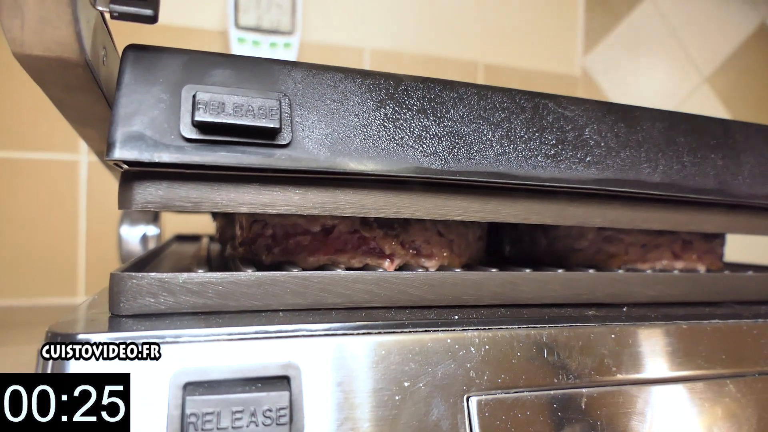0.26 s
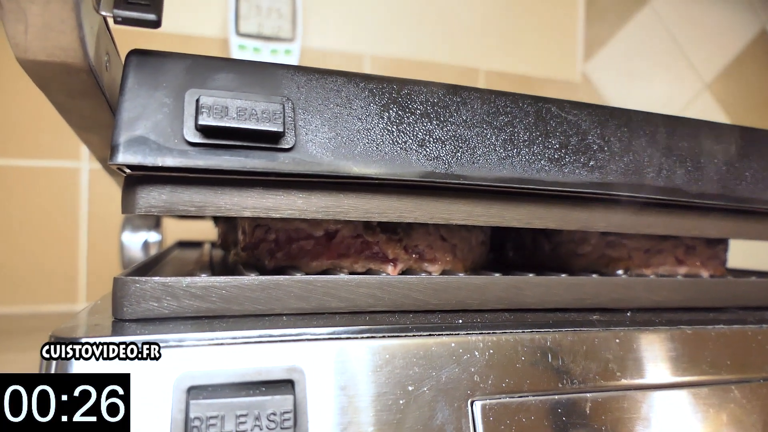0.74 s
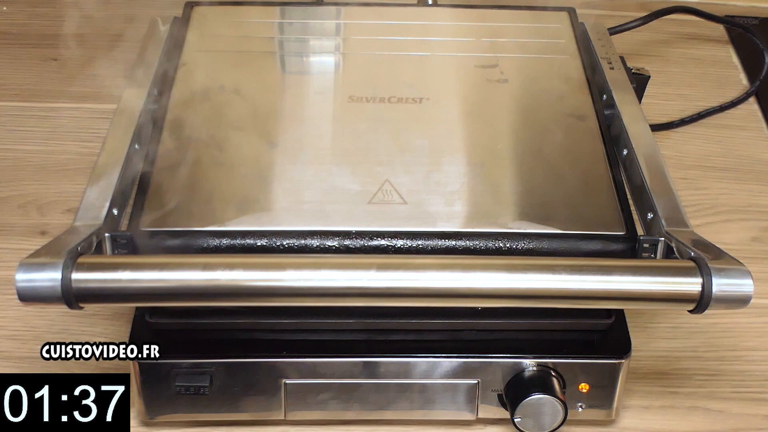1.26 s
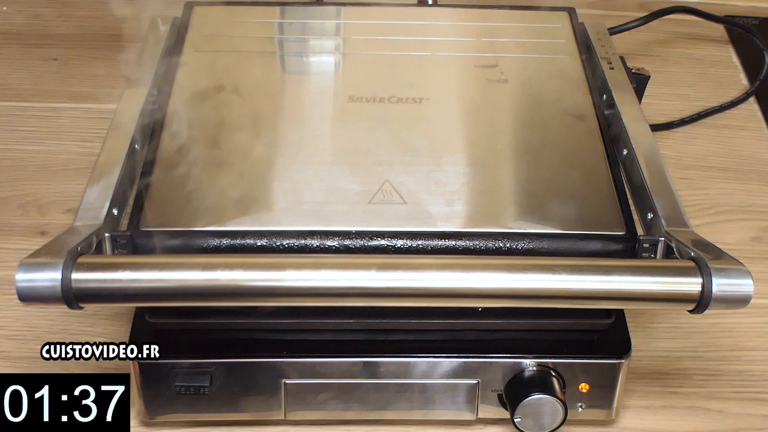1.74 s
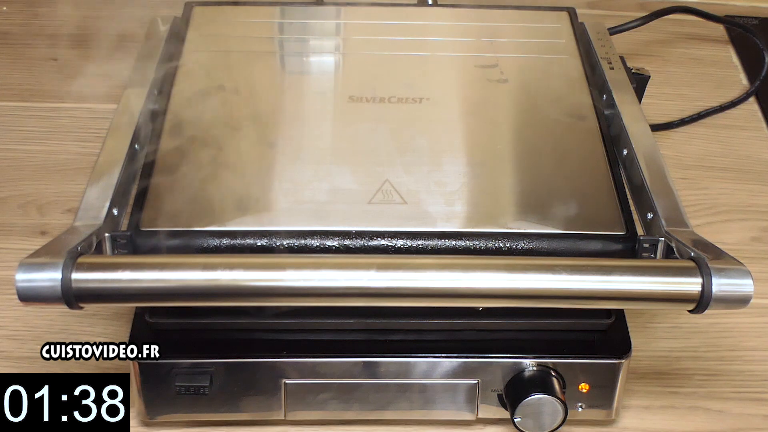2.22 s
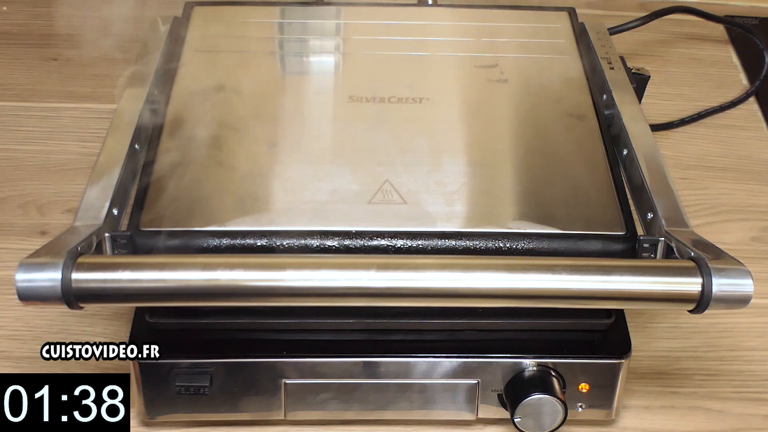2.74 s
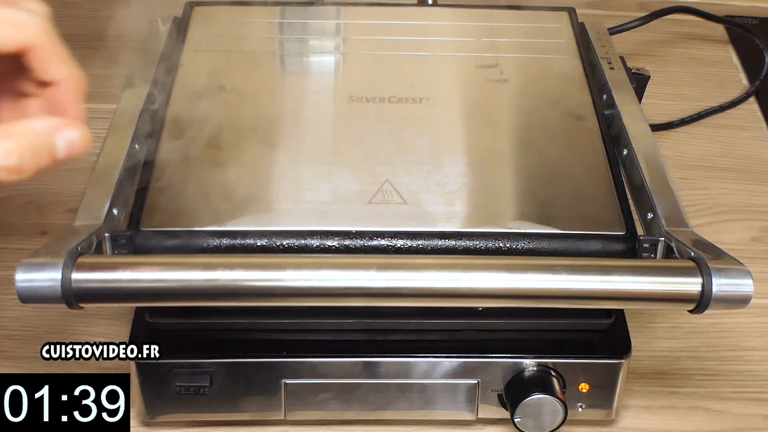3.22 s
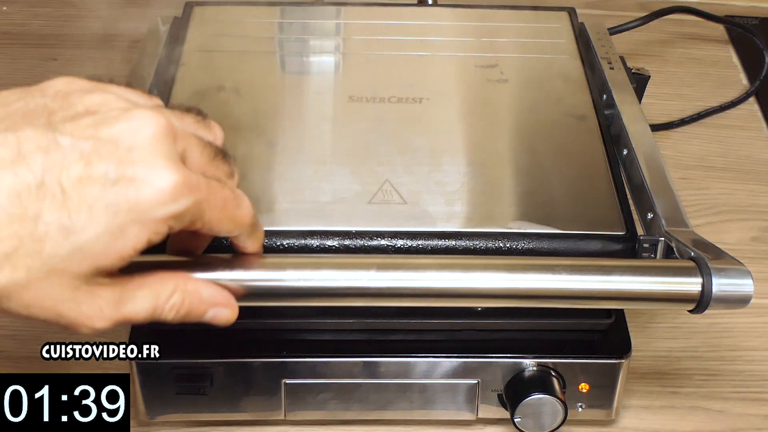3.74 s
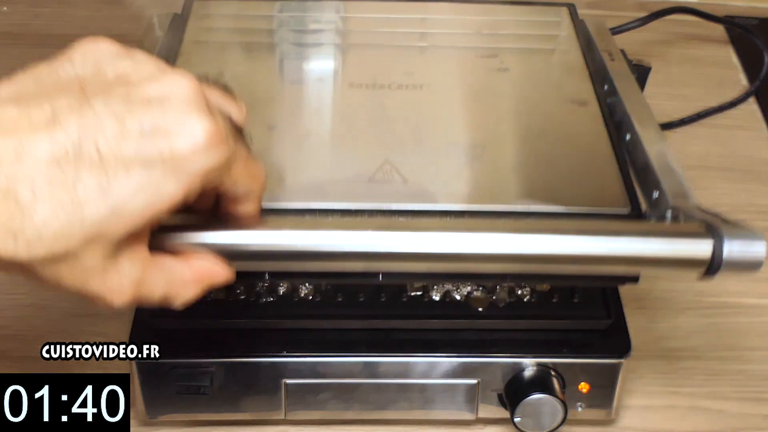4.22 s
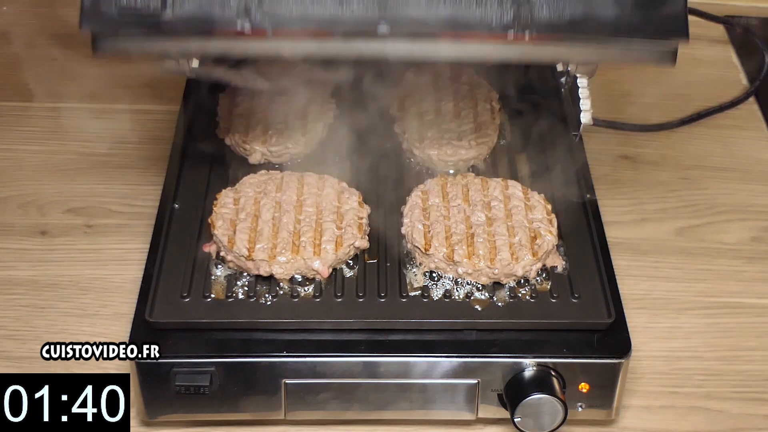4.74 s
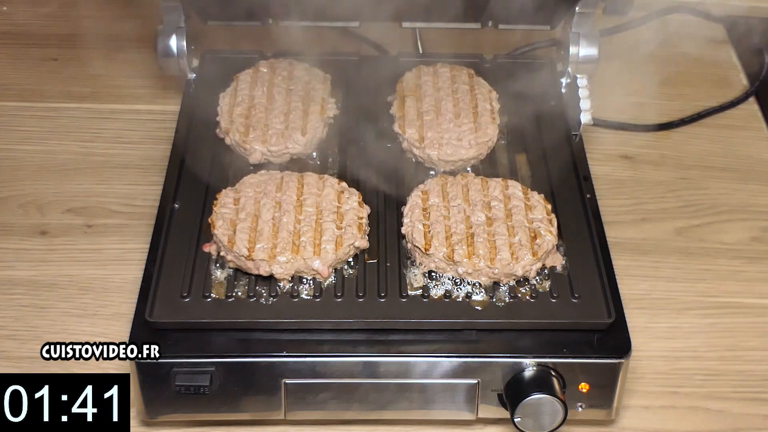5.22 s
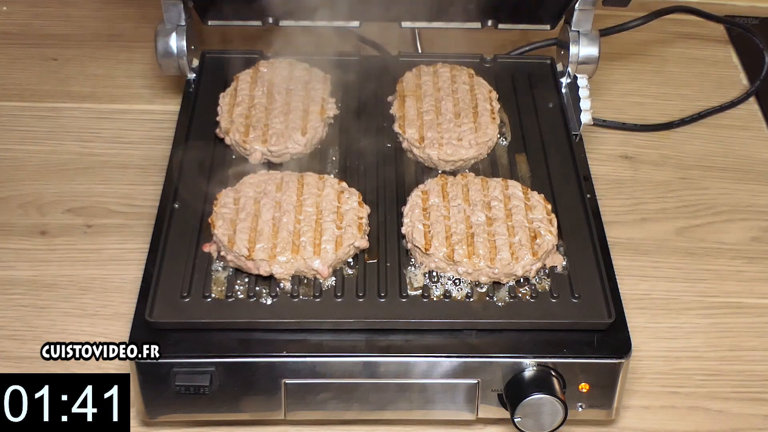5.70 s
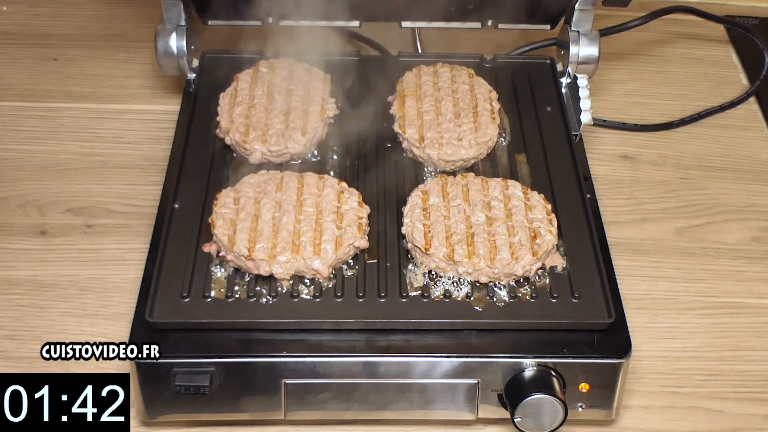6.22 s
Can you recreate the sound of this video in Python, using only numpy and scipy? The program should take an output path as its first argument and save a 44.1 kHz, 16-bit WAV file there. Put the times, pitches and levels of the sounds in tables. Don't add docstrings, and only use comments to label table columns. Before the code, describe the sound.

Bright, dense frying hiss with sharp fat pops, a sudden cut to quieter sizzling, soft hinge knocks, a lull, then crackling spurts on an open grill.

```python
import sys
import numpy as np
from scipy import signal
from scipy.fft import rfft, irfft, next_fast_len
from scipy.io import wavfile
from scipy.ndimage import uniform_filter1d, map_coordinates

SR = 44100
rng = np.random.default_rng(int(sys.argv[2]) if len(sys.argv) > 2 else 0)


def file_out(sig):
    cols = np.atleast_2d(sig).T
    lim = np.clip(cols, -1, 1)
    pcm = np.round(lim * 32767).astype(np.int16)
    wavfile.write(sys.argv[1], SR, pcm)


def volts_from_db(level):
    exponent = np.asarray(level, float) / 20
    return 10 ** exponent


N = 284886

# (time [s], opening [0-1])
LID_OPENING = [
    (4.2, 0.02),
    (4.7, 0.95),
]
# (frequency [Hz], density [dB per Hz])
GAP_SPECTRUM = [(350, -36), (600, -18), (788, -14.5), (928, -8.5), (1080, -7.5), (1220, -12.5), (1740, -5),
                (1890, -7.5), (3000, -4), (4520, -7.5), (6710, -3.5), (8460, -5), (10800, 4.5), (13800, -3),
                (15600, -11)]
SHUT_SPECTRUM = [(350, -63), (600, -7), (697, -19.5), (757, -8.5), (1110, -5), (1320, -4.5), (1810, -2.5),
                 (2020, -3.5), (4050, -2), (5110, -4), (6890, -1.5), (8570, -8.5), (11000, -7),
                 (13000, -15), (14200, -13.5), (14600, -20), (15400, -23), (15700, -25)]
OPEN_SPECTRUM = [(500, -40), (700, -18), (900, -11), (1200, -4.5), (1520, -4), (2350, -8.5), (2840, -7.5),
                 (4100, -9.5), (4750, -9), (5770, -7), (8230, -8.5), (10400, -5), (13400, -10.5),
                 (15600, -20)]
# (frequency [Hz], width [Hz], lift [dB])
GAP_MODES = [(990, 180, 4.5), (2470, 76, 4), (2900, 300, 0.7), (6900, 510, 4.5), (10200, 300, 2.5)]
SHUT_MODES = [(1800, 150, 3.2), (4150, 240, 1.6), (5470, 150, 2), (6500, 190, 1.1), (7340, 230, 1.2)]
OPEN_MODES = [(1750, 140, 2.6), (4040, 210, 4.7), (5200, 73, 0.94), (5900, 240, 0.71), (10150, 800, 3.2),
              (7000, 550, 1.3), (11100, 700, 1.1)]
# (frequency [Hz], correlation [-1 to 1])
LIKENESS = [(60, -0.41), (110, -0.6), (170, -0.2), (300, -0.036), (520, 0.4), (780, 0.72), (1200, 0.66),
            (2500, 0.72), (4200, 0.84), (5200, 0.91), (6500, 0.92), (8000, 0.84), (9800, 0.67),
            (12500, 0.54), (15000, 0.25)]
# (frequency [Hz], left minus right [dB])
BALANCE = [(60, 1), (110, -1.5), (200, 0), (380, 1), (700, -3), (1290, 0.5), (2380, -0.5), (4400, 1),
           (8120, -1), (15000, 2)]
# (time [s], high ring level [dB], low ring level [dB])
FAT_POPS = [(0.3594, -20, -13), (0.4595, -27, -28), (0.5379, -19, -28), (1.213, -34, -37),
            (1.4485, -31, -44), (1.5041, -34, -39), (1.754, -33, -40), (1.985, -33, -38),
            (3.9091, -37, -38), (4.5506, -43, -39), (4.6844, -41, -48), (5.0526, -39, -46),
            (5.1449, -38, -44), (5.3848, -34, -32), (5.4001, -32, -32), (5.4095, -36, -35),
            (5.4607, -35, -36), (5.497, -34, -39), (5.5036, -36, -41), (5.6169, -36, -37),
            (5.6582, -39, -46), (5.7667, -37, -41), (5.807, -42, -30), (5.8727, -33, -30),
            (5.9485, -30, -33), (6.005, -34, -42), (6.0354, -36, -44), (6.0474, -22, -26),
            (6.0483, -33, -40), (6.1039, -42, -31), (6.1219, -39, -36), (6.202, -31, -37),
            (6.2188, -33, -33), (6.2543, -42, -42), (6.2749, -37, -42), (6.345, -33, -29),
            (6.3919, -40, -44)]
# (time [s], peak level [dB])
HINGE_KNOCKS = [
    (4.323, -45),
    (4.352, -43),
    (4.3583, -34.5),
    (4.3655, -36.5),
    (4.371, -43),
    (4.531, -38),
]
# (frequency [Hz], level [dB], decay time t60 [s])
STEEL_MODES = [(1060, -6, .016), (1350, 0, .02), (1620, 0, .02), (1880, -2, .016), (2250, -3, .014),
               (2600, -7, .012), (3350, -3, .012), (3950, -8, .01)]
# (frequency [Hz], density [dB per Hz])
FAR_AIR_SPECTRUM = [(20, -24), (60, -12.5), (130, -6), (200, -6.5), (260, -5.5), (310, -2.5), (345, -5),
                    (490, -1.5), (540, -4.5), (600, -2.5), (645, -10.5), (700, -6.5), (900, -21),
                    (1200, -54)]
NEAR_AIR_SPECTRUM = [(15, -62), (25, -32), (82, -11), (118, -9), (157, -4.5), (226, -4.5), (257, -35),
                     (312, -3.5), (354, 1), (467, -8), (700, -8), (910, -21), (1540, -120)]
SHUFFLE_SPECTRUM = [(90, -18), (150, -4.5), (230, -3.5), (310, -4), (400, -7), (500, -58)]
# (time [s], hold [s], fizz level [dB], spray over fizz [dB])
JUICE_FLURRIES = [(4.517, .04, -62, -4), (4.654, 0.05, -55, 0), (4.724, 2.5, -55, -3.5),
                  (4.805, 0.088, -52.5, -2), (4.942, 0.15, -55, -3.5), (5.122, 0.13, -53.5, 3),
                  (5.334, 0.14, -53, 1.5), (5.48, 0.29, -54.5, 0.5), (5.784, 0.11, -52, 1),
                  (5.906, 0.23, -54, 2), (6.173, 0.2, -56, -0.5), (6.362, 0.11, -55.5, -1)]
# (middle time [s], half length [s], level [dB], higher board's share [0-1])
WEIGHT_SHIFTS = [(3.0, 0.1, -66, 0.8), (3.143, 0.11, -54.5, 0.07), (3.288, 0.082, -60, 0.2),
                 (3.47, 0.09, -59.5, 0.2), (3.67, 0.035, -57, 0.6), (3.782, 0.037, -56, 1),
                 (3.9, .03, -59, 0.6), (4.026, 0.029, -56.5, 0.7), (4.12, .04, -57, 0.3),
                 (4.24, .1, -58, 0.7), (4.37, 0.065, -60, 1), (6.422, 0.12, -63, 1)]
# (frequency [Hz], width [Hz])
FLOOR_BOARDS = [
    (228, 73),
    (292, 54),
]
# (middle time [s], half length [s], frequency [Hz], level [dB])
NARROW_HISSES = [(4.4, .1, 626, -65.5), (4.47, 0.13, 1270, -63), (4.45, 0.16, 830, -68.5),
                 (4.43, .05, 9600, -65), (4.552, .012, 7300, -61), (4.69, .03, 10000, -61),
                 (5.02, .04, 3300, -60), (5.35, 0.037, 3500, -62), (5.17, .03, 5900, -60),
                 (4.7, .08, 1290, -68), (4.552, 0.011, 4100, -59), (4.706, .03, 7000, -59),
                 (4.76, 0.037, 3900, -64), (4.79, 0.026, 1750, -65), (4.88, .04, 6700, -58),
                 (4.88, .05, 3600, -60), (4.9, 0.1, 1700, -66), (5.005, .25, 1010, -70),
                 (5.065, 0.045, 1500, -63), (5.17, .04, 10600, -64), (5.2, 0.055, 6360, -57),
                 (5.24, .04, 1700, -65), (5.4, .04, 5900, -55), (5.44, .06, 4000, -60),
                 (5.602, .06, 5800, -61), (5.85, .05, 5870, -53), (5.97, .05, 6000, -57),
                 (6.12, .04, 5800, -57), (6.3, 0.055, 10200, -58)]
# (middle time [s], half length [s], frequency [Hz], level [dB])
LID_MODES = [(4.87, 0.45, 624, -75.5), (4.75, 0.44, 673, -77), (4.43, 0.38, 1077, -70),
             (5.2, 0.69, 495, -74.5), (5.9, .4, 576, -79), (5.15, .3, 377, -78)]

JUMP_S, LIFT_S = .8487, 4.125

# (body [dB], fizz [dB], spray [dB]), and how fast each dies at the lift
NEAR_DB, SHUT_DB, LULL_DB = (-40, -31, -36), (-51.5, -46.5, -47.5), (-62, -56, -63.5)
FADE_DB_PER_S, PEEL_S = (47, 102, 96), 0.076
FLURRY_ATTACK_S, FLURRY_DIES_DB_PER_S = 0.028, 91
FLURRY_BODY_DB, DRYING_DB_PER_S = -4.5, 2

# (air [dB], shuffle [dB]); the last is the change once the lid stands open
ROOM_NEAR_DB, ROOM_FAR_DB, ROOM_OPEN_DB = (-55, -60.5), (-63.5, -66.5), (-0.5, -12)
ROOM_SETTLES_DB_PER_S = 1.2


def unit(x):
    return x / np.sqrt(np.mean(x ** 2) + 1e-20)


def column(values):
    return np.reshape(values, (-1, 1))


def along(points, hz):
    f, v = np.transpose(points)
    return np.interp(np.log(hz + 1), np.log(f + 1), v)


def lid_opening():
    s, opening = np.transpose(LID_OPENING)
    return np.clip(np.interp(np.arange(N) / SR, s, opening), 0, 1)


def jumped(near, far):
    return np.where(np.arange(N) < JUMP_S * SR, near, far)


def wobble(rate):
    knots = rng.standard_normal(int(N * rate / SR) + 4)
    return map_coordinates(knots, [np.arange(N) * rate / SR])


def filtered(x, response):
    m = next_fast_len(N + 8192)
    return irfft(rfft(x, m) * response(np.fft.rfftfreq(m, 1 / SR)), m)[..., :N]


def colour(spectrum, modes):
    def gain(hz):
        lift = sum(db / (1 + ((hz - centre) / width * 2) ** 2) for centre, width, db in modes)
        return volts_from_db(along(spectrum, hz) + lift)
    return gain


def pair(mid, side):
    def share(hz):
        angle = np.arccos(np.clip(along(LIKENESS, hz), -1, 1)) / 2
        return np.array([np.cos(angle), np.sin(angle)])

    def balance(hz):
        return volts_from_db(along(BALANCE, hz) * column([.5, -.5]))

    mid, side = filtered(np.array([mid, side]), share)
    return filtered(np.array([mid + side, mid - side]), balance)


def noise_pair(side_gain):
    return pair(*(rng.standard_normal((2, N)) * column([1, side_gain])))


def tiles(x):
    count, latest_s, echo_db = 9, .022, -24
    delays = (latest_s * SR * rng.random(count)).astype(int)
    return x + volts_from_db(echo_db) * sum(np.roll(x, d, axis=-1) for d in delays)


def mains_hum():
    level_db = -71 + .5 * wobble(2.5) + column([-2.5, 0])
    return volts_from_db(level_db) * np.sin(2 * np.pi * 150.05 * np.arange(N) / SR)


def room_air():
    since = np.clip(np.arange(N) / SR - LIFT_S, 0, None)
    near = unit(filtered(noise_pair(.45), colour(NEAR_AIR_SPECTRUM, [])))
    far = unit(filtered(noise_pair(1.3), colour(FAR_AIR_SPECTRUM, [])))
    air = jumped(volts_from_db(-0.5) * near, volts_from_db(3.0) * far)
    return air * volts_from_db(0.28 * wobble(4.3) - ROOM_SETTLES_DB_PER_S * since)


def floor_shuffle(still):
    t = np.arange(N) / SR
    moves = 0
    for s, half_s, db, high in WEIGHT_SHIFTS:
        power = volts_from_db(db - 5.5 * ((t - s) / half_s) ** 2) ** 2
        moves = moves + power * np.clip(column([1 - high, high]), 0, 1)
    centred = noise_pair(.4)
    shuffle = 0
    for power, (hz, width_hz) in zip(moves, FLOOR_BOARDS):
        board = unit(filtered(centred, colour(SHUFFLE_SPECTRUM, [(hz, width_hz, 9)])))
        shuffle = shuffle + np.sqrt(still ** 2 / 2 + power) * board
    return volts_from_db(0.61 * wobble(30) - 2.5) * shuffle


def kitchen():
    far_db = column(ROOM_FAR_DB) + column(ROOM_OPEN_DB) * lid_opening()
    air_gain, still = volts_from_db(jumped(column(ROOM_NEAR_DB), far_db))
    return air_gain * room_air() + floor_shuffle(still) + mains_hum()


def lid_tones():
    t = np.arange(N) / SR
    out = 0
    for s, half_s, hz, db in LID_MODES:
        level_db = db + 3 + 3 * wobble(8) - 6 * ((t - s) / half_s) ** 2
        out = out + volts_from_db(level_db) * np.sin(2 * np.pi * hz * t + .8 * wobble(6))
    return out


def hinge():
    out, t = np.zeros(N + SR), np.arange(SR // 4) / SR
    onset = 1 - np.exp(-t / .0004)
    for s, db in HINGE_KNOCKS:
        ring = 0
        for hz, level_db, t60_s in STEEL_MODES:
            ring = ring + volts_from_db(level_db + rng.normal(0, 1.2) - 60 * t / t60_s) * np.sin(2 * np.pi * hz * t)
        out[round(s * SR):][:len(t)] += volts_from_db(db - 7) * ring * onset
    return out[:N]


def narrow_hisses():
    width = 0.067
    hz, t, z = signal.stft(noise_pair(1), SR, nperseg=1024)
    power = 0
    for s, half_s, jet_hz, db in NARROW_HISSES:
        shape = np.exp(-((t - s) / half_s) ** 2 - ((column(hz) / jet_hz - 1) / width) ** 2)
        power = power + volts_from_db(db) ** 2 * shape * SR / (3.0 * width * jet_hz)
    return signal.istft(z * np.sqrt(power), SR, nperseg=1024)[1][:, :N]


def pops():
    out, t = np.zeros((2, N + SR)), np.arange(400) / SR
    rise_s = .0001
    rise = 1 - np.exp(-(t / rise_s) ** 2)

    def ring(db, t60_s, hz, detune_db):
        pitch = hz * volts_from_db(rng.normal(0, detune_db))
        return volts_from_db(db - 60 * t / t60_s) * np.sin(2 * np.pi * pitch * t)

    for s, high_db, low_db in FAT_POPS:
        high = ring(high_db + 4, .0018, 10800, .3)
        low = ring(low_db + 2, .0022, 5500, 1)
        top = ring(high_db - 3.5, .0016, 13800, .3)
        answer = volts_from_db(high_db - 17 - 60 * t / .009) * rng.standard_normal((2, len(t)))
        out[:, round((s - rise_s) * SR):][:, :len(t)] += rise * (top + high + low + answer)
    return filtered(out[:, :N], lambda hz: 1 / (1 + (2800 / (hz + 1)) ** 6))


def bubbles(per_second, cycles):
    where, pitch, strength = np.split(rng.random((int(per_second * N / SR), 3)), 3, axis=1)
    t = np.arange(96) / SR
    hz = 1500 + 13500 * pitch
    elapsed = t * hz / cycles
    ring = volts_from_db(-9 * elapsed + 12.6 * strength) * np.sin(2 * np.pi * hz * t * (1 + 0.015 * elapsed))
    ring = ring * np.sqrt(hz) * np.hanning(2 * len(t))[len(t):]
    at = (where * N).astype(int) + np.arange(len(t))
    return unit(np.bincount(at.ravel(), ring.ravel(), N)[:N])


def bursts(fizz, per_second, spread_db, share, patchy_db):
    happens = rng.random(N) < per_second / SR
    clicks = happens * volts_from_db(spread_db * rng.standard_normal(N)) * rng.choice([-1, 1], N)
    z = signal.stft(rng.standard_normal(N), nperseg=256)[2]
    patches = uniform_filter1d(rng.standard_normal(z.shape), size=3, axis=0)
    patches = unit(uniform_filter1d(patches, size=14, axis=1))
    hiss = unit(signal.istft(z * volts_from_db(patchy_db * patches), nperseg=256)[1][:N])
    grains = unit(0.7 * unit(clicks) + 0.68 * fizz)
    return np.sqrt(share) * grains + np.sqrt(1 - share) * hiss


def position(fizz, spectrum, modes, **grain):
    mid = bursts(fizz, **grain)
    side = bursts(np.roll(fizz, SR), **grain)
    both = tiles(pair(mid, side))
    shape = colour(spectrum, modes)

    def split(hz):
        body, below_spray = (1 / (1 + (hz / edge_hz) ** 10) for edge_hz in (2500, 8500))
        bands = np.array([body, below_spray - body, 1 - below_spray])
        return (bands * shape(hz))[:, None]

    bands = filtered(both, split)
    return bands / bands.mean(1).std(1)[:, None, None]


def boiling():
    t = np.arange(N) / SR
    since = np.clip(t - LIFT_S, 0, None)
    dying_db = column(SHUT_DB) - column(FADE_DB_PER_S) * since ** 2 / (since + PEEL_S)
    lull_db = column(LULL_DB) - DRYING_DB_PER_S * since
    power = volts_from_db(dying_db) ** 2 + volts_from_db(lull_db) ** 2
    for s, hold_s, db, spray_db in JUICE_FLURRIES:
        attack = np.clip((t - s) / FLURRY_ATTACK_S, 0, 1)
        decay = volts_from_db(-FLURRY_DIES_DB_PER_S * np.clip(t - s - hold_s, 0, 2))
        level_db = db + column([FLURRY_BODY_DB, 0, spray_db])
        level_db = level_db - column([1, 0, 0]) * DRYING_DB_PER_S * since
        power = power + (attack * decay * volts_from_db(level_db)) ** 2
    return jumped(volts_from_db(column(NEAR_DB)), np.sqrt(power))


def sizzle():
    fizz = bubbles(1500, cycles=7.4)
    near = position(fizz, GAP_SPECTRUM, GAP_MODES, per_second=3500, spread_db=1.5, share=0.11, patchy_db=0.5)
    shut = position(fizz, SHUT_SPECTRUM, SHUT_MODES, per_second=4000, spread_db=3.5, share=0.097,
                    patchy_db=0.63)
    bare = position(fizz, OPEN_SPECTRUM, OPEN_MODES, per_second=760, spread_db=0.5, share=0.32, patchy_db=1.2)
    near = near * volts_from_db(0.18 * wobble(24.5))
    shut = shut * volts_from_db(.3 * wobble(11))
    bare = bare * volts_from_db(.2 * wobble(14) + .6 * wobble(60))
    bare = bare * volts_from_db(column([-.25, .25]))
    opening = lid_opening()
    far = np.sqrt(1 - opening) * shut + np.sqrt(opening) * bare
    total = np.sum(boiling()[:, None] * jumped(near, far), axis=0)
    return filtered(total, lambda hz: 1 / (1 + (300 / (hz + 1)) ** 4))


def scene():
    return kitchen() + lid_tones() + hinge() + narrow_hisses() + pops() + sizzle()


def low_pass(x):
    return signal.sosfilt(signal.butter(12, 15770, fs=SR, output="sos"), x)


def record(dry):
    low_hz, top_hz = 22, 15720
    mix = filtered(dry, lambda hz: hz / (hz + low_hz) / (1 + (hz / top_hz) ** 200))
    return low_pass(mix)


dry = scene()
out = record(dry)
file_out(out)
```